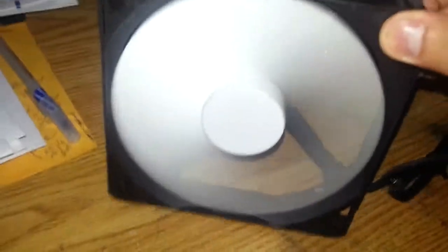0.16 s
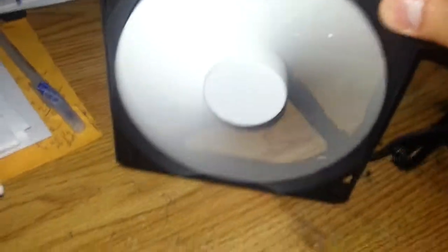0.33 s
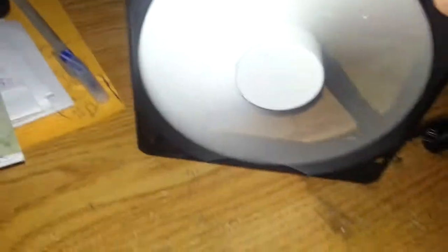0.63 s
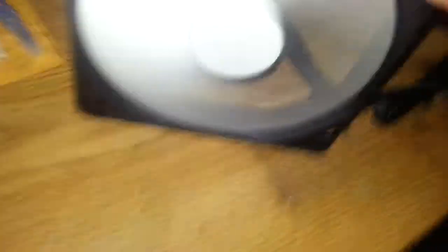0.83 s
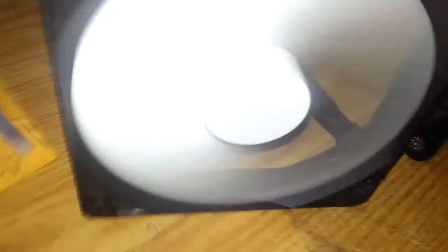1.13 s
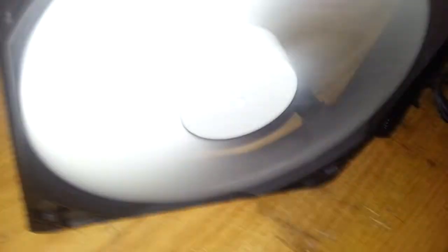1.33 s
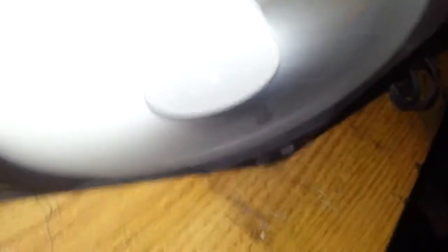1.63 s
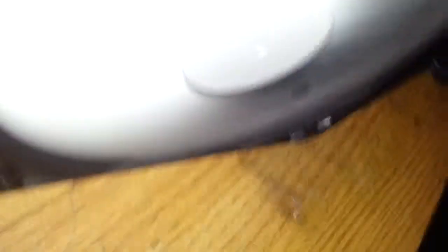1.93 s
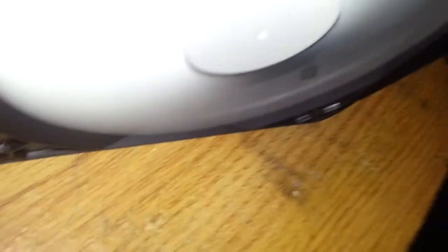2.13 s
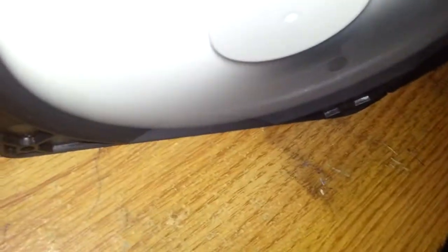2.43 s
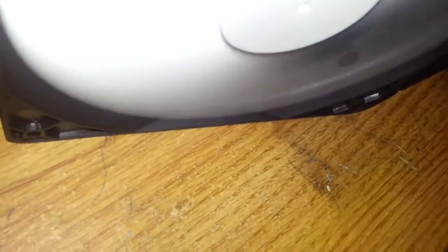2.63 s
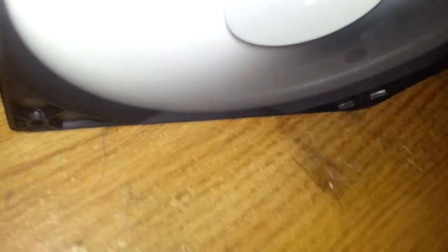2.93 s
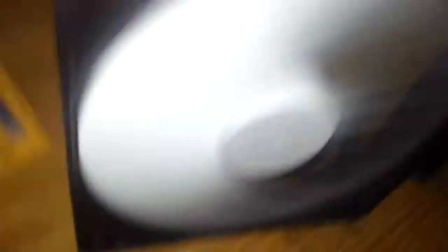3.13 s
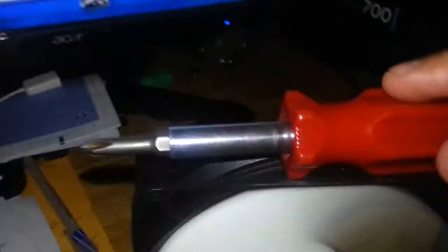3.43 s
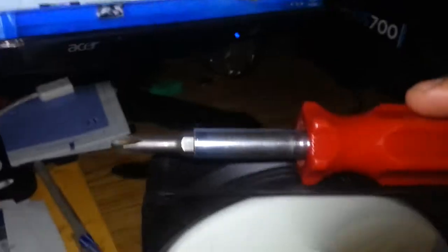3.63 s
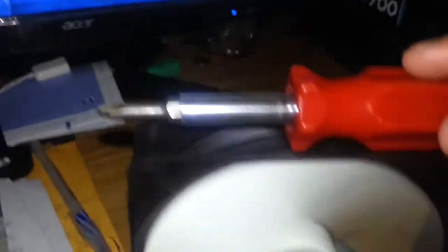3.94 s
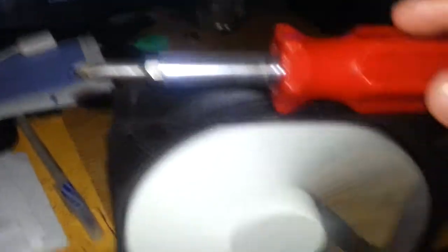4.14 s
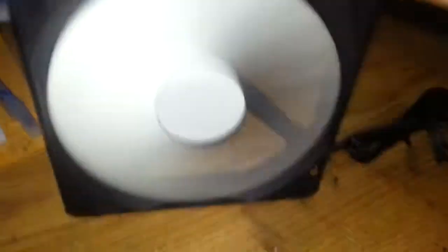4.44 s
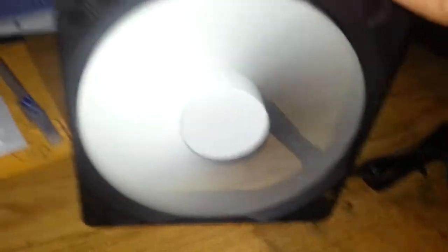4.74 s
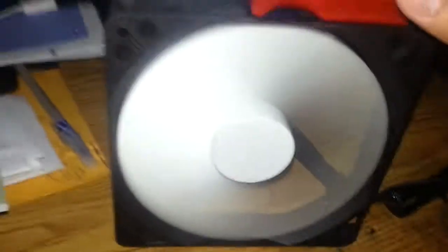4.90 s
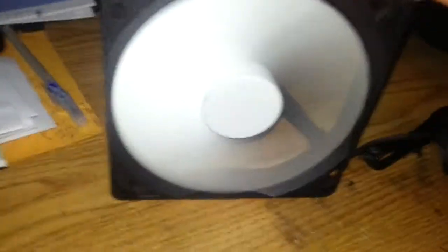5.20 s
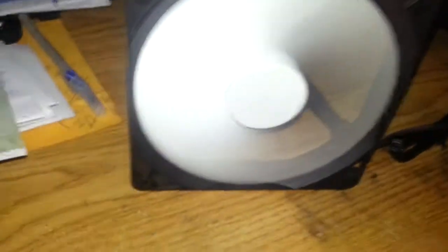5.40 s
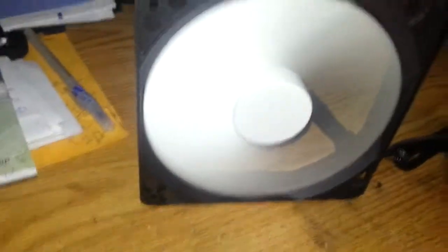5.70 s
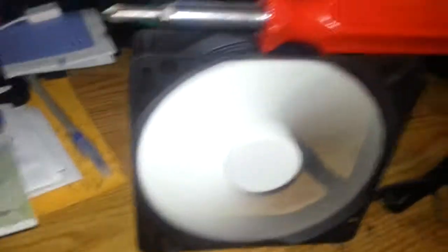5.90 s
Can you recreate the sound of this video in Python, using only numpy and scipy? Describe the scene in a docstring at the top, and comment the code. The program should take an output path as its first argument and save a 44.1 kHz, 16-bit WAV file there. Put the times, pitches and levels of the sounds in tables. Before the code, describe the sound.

Steady fan rush, close up and slightly uneven, with a thin motor hum wavering beneath. After a soft thump at the outset, the microphone shifts from the front to the side and the sound grows darker and stronger. Near the middle there is one hard plastic knock with a dull thump, a quick rattle of smaller contacts, wooden taps and bright steel ticks. The microphone returns to the front and the fan continues in a dry small room.

```python
"""On a wooden desk in a small room, a computer case fan runs: airflow hiss is shaped noise, the thin motor whine
near 300 Hz is a set of sines locked to one speed, and faint hums are wavering sines.
The microphone moves from in front of the fan to beside its frame and back; each partial is beamed its own way.
A hand bumps the fan, then reaches past it for a screwdriver, which knocks on the frame and clatters on the desk:
each contact is a click of noise, decaying modes and a desk thud; scuffs are brief noise.
A single low pulse makes a dull thump at the hardest knock."""
import sys
import numpy as np
from scipy import signal
from scipy.fft import rfft, irfft, next_fast_len
from scipy.io import wavfile
from scipy.ndimage import uniform_filter1d, map_coordinates

SR = 44100
rng = np.random.default_rng(int(sys.argv[2]) if len(sys.argv) > 2 else 0)


def master(y):
    """Save y as 16-bit WAV."""
    cut = np.clip(np.atleast_2d(y).T, -1, 1)
    pcm = np.round(cut * 32767)  # scale
    wavfile.write(sys.argv[1], SR, pcm.astype(np.int16))


N = 267334

# Closeness runs from 0 (in front of the fan) to 1 (beside its frame); left-right dB is positive to the left.
# microphone path: time_s, closeness (0-1), airflow_level_db, left_right_db
MIC_PATH = [(0, 0.22, 0, 2), (1.02, 0.28, 0.5, 2), (1.17, 0.35, 1.2, 1), (1.45, 0.36, 0.5, -0.5),
            (1.58, 0.69, 2, 0.5), (2.05, 0.89, 2.5, 0.5), (3.1, 0.92, 4, 1.5), (3.3, 0.13, 1, 2),
            (4.05, 0.12, 1, 1), (4.33, 0.04, 1.5, -1), (6.06, 0.01, 1, 0.5)]
# closeness at which the microphone looks down from above, sees the blades aslant, and passes over the rim
ABOVE, ASLANT, RIM = 0.11, 0.22, 0.42

# airflow spectrum in front of the fan, relative: frequency_hz, level_db (per Hz)
AIR_IN_FRONT = [(55, -28), (170, -12.5), (230, -5), (410, 0.5), (520, -5), (740, -5.5), (920, 4.5),
                (1300, -0.5), (2700, -0.5), (4700, -7), (6000, -15), (9000, -18.5), (11200, -33),
                (14500, -39)]
# airflow spectrum beside the frame, relative: frequency_hz, level_db (per Hz)
AIR_BESIDE = [(50, -34), (130, -15.5), (230, -3.5), (380, -2.5), (520, -4), (850, 0), (1400, -0.5),
              (2800, -5.5), (4000, -12), (4800, -10.5), (6000, -18.5), (9000, -19), (11200, -35),
              (14500, -51)]
# correlation of the air noise at the two microphone ports: frequency_hz, likeness (clipped to -1..1)
PORT_LIKENESS = [(60, -0.1), (200, 1.04), (750, 0.65), (1200, 0.45), (1800, 0.5), (4000, 0)]
# balance of the air noise between the ports: frequency_hz, left_right_db
PORT_BALANCE = [(100, -4.5), (500, -1), (1200, -3.5), (2700, -8), (6000, -7), (12000, -1)]

# motor pulse rate, picking up after the bump and then wandering a little: time_s, pitch_hz
MOTOR_SPEED = [(0, 297.7), (.2, 298.8), (.65, 300), (1.1, 301), (1.9, 301.5), (2.6, 299.8), (3.3, 299.6),
               (4.1, 300.2), (5, 300.5), (5.8, 301)]
# radiation of the four lowest partials:
# multiple (of the pulse rate), front_db, aslant_db, over_rim_db, beside_db
PARTIAL_BEAMS = [(1, -45, -50.5, -43, -31), (2, -60.5, -50, -46, -45.5), (3, -40, -48.5, -46.5, -50),
                 (4, -42, -41.5, -47, -48)]
# swells and dips of the four lowest partials: time_s, first_db, second_db, third_db, fourth_db
PARTIAL_SWELLS = [(0, -1, -3, -11, -1.5), (.17, -1, 0, -6, -2.5), (.3, -1.5, -3.5, 0.5, 2),
                  (.57, -5, 1.5, 4.5, 2.5), (.66, 4, -3, 1, -2), (.76, 0, -5.5, -6, 2.5),
                  (1, -2, 3.5, -4, 0.5), (1.13, 3, -2, -2, -4), (1.4, -2.5, 3.5, -1.5, -5),
                  (1.58, 3, -1, 1, -9), (1.75, -1, 1, 2.5, -2), (2.15, -.5, 4, 1.5, 0.5),
                  (2.44, 0, -3, 0.5, -1), (2.57, 2.5, 3.5, 1, -5), (2.73, 2.5, -1.5, 5, 2.5),
                  (2.85, 0.5, -12, 2, -5), (3.22, 2.5, -4, 0.5, -1), (3.42, 1, -1, 1, 2),
                  (3.56, 0.5, 1, -1, -4), (3.7, -0.5, -4, -2, -2.5), (3.86, -2, 0, -3, 1),
                  (3.96, 1.5, 0, -1, -3.5), (4.1, -1.5, -5, -7, -1), (4.25, -1.5, 3, -0.5, 1),
                  (4.65, 2, -3, 0.5, 0.5), (5.05, 1, -11, -1.5, 0.5), (5.4, 1, -4, 2, -1.5),
                  (5.75, 0, -5, -0.5, 2.5), (6.06, -5, 1, -2.5, 1.5)]
# the four lowest partials at the two ports: front_left_right_db, front_left_lead_rad,
# beside_left_right_db, beside_left_lead_rad, turned_at (closeness by which the turn is complete)
PARTIAL_PLACES = [(0, 0.29, -6, 1.5, 0.57), (-8.5, -0.023, -4, -1, .8), (-2.5, -0.055, 7.5, -1.5, 0.55),
                  (-4.5, -0.21, -1, -1.5, 0.31)]
# upper partials: multiple (of the pulse rate), front_db, above_db, beside_db
UPPER_PARTIALS = [(5, -52, -50, -50), (6, -55, -56, -55), (7, -57.5, -51.5, -56.5), (8, -54.5, -53, -56.5),
                  (9, -63, -69, -55), (10, -56, -54.5, -58), (12, -67, -61, -69)]
# a reaching hand disturbs the intake: start_s, end_s, fundamental_lift_db, low_overtone_lift_db,
# fundamental_turn_rad (between the ports)
HAND_REACHES = [(2.594, 2.79, -5.5, 6, 1.8), (2.827, 3.142, -1, 6.5, -0.47)]
REACH_FADE_S = 0.019
# faint wavering hums of steady mean pitch: pitch_hz, level_db
HUM_TONES = [(217.4, -59), (400.6, -56), (701, -65.5), (1603, -62)]

# In all contact tables below, click_db is before a common halving and desk_db before a common thud level.
# desk modes under every contact, before random scatter: pitch_hz, level_db, t60_s
DESK_MODES = [(126, -22, 0.19), (233, -13.5, 0.076), (385, -2, 0.034), (544, -2, 0.052), (702, -7, 0.038),
              (1030, -5, 0.025), (1390, -2, 0.049)]
# relative spectrum of the hard click of a contact: frequency_hz, level_db (per Hz)
CLICK_SPECTRUM = [(100, -5), (450, -9), (800, 11), (1500, 2), (2200, 7), (3300, 2), (5300, -1.5),
                  (7000, 2.5), (9500, -2), (12000, -6), (15000, -12)]
# a hand bumps the fan, and later jogs it in reaching past: start_s, ring_db
HAND_BUMPS = [(0.0716, -17), (0.079, -22.5), (0.0894, -26), (0.0972, -37), (2.8165, -18), (2.921, -25)]
# modes of the bumped fan: pitch_hz, level_db, t60_s
FAN_MODES = [(299, -7.5, 0.057), (430, 1, 0.045), (710, -3, 0.016), (800, -3.5, 0.033)]
# faint high scuffs of the handling: centre_s, level_db, centre_hz, half_length_s (to 1/e)
SCUFF_EVENTS = [(1.09, -43, 8000, .0015), (2.381, -33.5, 8500, 0.0018), (5.62, -52, 12800, 0.02)]
# knocks of the screwdriver on the plastic frame, a duller contact as the frame rocks back on the desk,
# and a graze: start_s, ring_db, click_db, desk_db, pitch_ratio (of the spot)
FRAME_CONTACTS = [(2.457, -8.5, 3, -31, 1), (2.4652, -25, -12, -44, 1.02), (2.47, -30, -10, -36, 1),
                  (2.4965, -16, -6.5, -16.5, 1.13), (2.5028, -22, -17, -16.5, .74),
                  (2.5078, -23, -19, -24, .92), (2.516, -30, -19, -30, 1.25), (2.5218, -27, -21, -27, 1.1),
                  (2.8145, -24, -19, -27, 1.05)]
# modes of the frame: pitch_hz, level_db, t60_s
FRAME_MODES = [(190, -23, 0.057), (760, -11, 0.033), (845, 2.5, 0.044), (948, -4, 0.044), (1070, -2.5, .04),
               (2020, -19, 0.043), (2320, -9, .04), (3265, -2.5, 0.021)]
# dull thump at the hardest knock: level scales u * exp(-u), whose peak is 1/e
PULSE_S, PULSE_DB, PULSE_RISE_S = 2.457, -24, 0.00074
# screwdriver taps on the desk: start_s, ring_db, click_db, desk_db, left_right_db, pitch_ratio (of the spot)
DESK_TAPS = [(2.812, -16.5, -8, -17, -5, 0.92), (2.9426, -13.5, -8, -19, -9.5, 1.004),
             (2.949, -14, -11, -15, -1, 1.07), (2.9732, -20.5, -27, -19, -7, 1),
             (3.0782, -15.5, -15, -15.5, -5, .97), (3.083, -16.5, -20, -30, -5, .97),
             (3.0879, -24, -20, -20, -4, 1)]
# modes of the tapped spot: pitch_hz, level_db, t60_s
TAPPED_SPOT_MODES = [(953, -5.5, 0.037), (1624, 2.5, 0.02), (1980, -10, 0.011), (2510, -2, 0.015)]
# clacks of the handle: start_s, ring_db
HANDLE_CLACKS = [(2.477, -14.5), (2.9609, -8), (2.9662, -13.5), (2.968, -12.5)]
# modes of the handle: pitch_hz, level_db, t60_s
HANDLE_MODES = [(2330, -0.5, 0.017), (2710, -2.5, 0.021), (3700, -11, 0.015)]
# ticks of the steel bit in its shaft: start_s, ring_db, click_db
BIT_TICKS = [(2.736, -15.5, -18), (2.8157, -5, -10), (2.8428, -19, -24), (2.924, -13.5, -15),
             (2.9481, -3.5, -8), (2.97, -9.5, -11), (3.0114, -16, -20), (3.08, -15.5, -23),
             (3.408, -26, -34)]
# modes of the bit: pitch_hz, level_db, t60_s
BIT_MODES = [(3333, -5.5, 0.018), (4070, -9, 0.0066), (4450, -1.5, 0.0074)]
# reverberation of the small room: frequency_hz, t60_s
ROOM_DECAY = [(150, 0.62), (1000, 0.18), (2500, 0.16), (4000, 0.22), (12000, 0.28)]
TOP_HZ = 15000  # band limit


def amp(db):
    """Level to gain: 20 dB is a factor of ten in amplitude."""
    return 10 ** (np.asarray(db) / 20)


def unit(x):
    """Normalisation to an rms of 1."""
    return x / np.sqrt(np.mean(x ** 2) + 1e-20)


def along(points, hz):
    """Interpolation of (frequency, value) points on a logarithmic frequency axis."""
    f, v = np.transpose(points)
    return np.interp(np.log(hz + 1), np.log(f + 1), v)


def curves(rows):
    """Linear interpolation in time: one value per sample for each column after the time."""
    s, *columns = np.transpose(rows)
    return [np.interp(np.arange(N) / SR, s, column) for column in columns]


def wobble(rate):
    """Smooth random modulation: a spline through normal deviates, rate knots a second."""
    knots = rng.standard_normal(int(N * rate / SR) + 4)
    return map_coordinates(knots, [np.arange(N) * rate / SR])


def filtered(x, response):
    """Linear filtering: the spectrum of x is multiplied by a response of frequency."""
    n = x.shape[-1]
    m = next_fast_len(n + 8192)
    return irfft(rfft(x, m) * response(np.fft.rfftfreq(m, 1 / SR)), m)[..., :n]


def split(difference):
    """Stereo difference: half is added at the left and half taken from the right."""
    return np.array([[0.5], [-0.5]]) * difference


def decay(t, t60):
    """Exponential decay by 60 dB in t60 seconds."""
    return np.exp(-np.log(1000) * t / t60)


def highpass(x, cutoff_hz):
    """Second-order high-pass: bass falls by 12 dB an octave."""
    return signal.sosfilt(signal.butter(2, cutoff_hz, "highpass", fs=SR, output="sos"), x)


def rush(spectrum, patchy_db, lag_ms):
    """Turbulence as partly coherent stereo noise of rms 1, faintly patchy from eddies and late at the left port."""
    z = signal.stft(rng.standard_normal((2, N)), nperseg=512)[2]
    patches = uniform_filter1d(rng.standard_normal(z.shape[1:]), size=6, axis=0)  # across frequency
    patches = uniform_filter1d(patches, size=14, axis=1)  # along time
    pair = signal.istft(z * amp(patchy_db * unit(patches)), nperseg=512)[1][:, :N]

    def mid_side(hz):
        # shares cos and sin of half the angle give the ports the wanted correlation
        angle = np.arccos(np.clip(along(PORT_LIKENESS, hz), -1, 1)) / 2
        return amp(along(spectrum, hz)) * [np.cos(angle), np.sin(angle)]

    def ports(hz):
        delay = np.exp(-2j * np.pi * split(hz) * lag_ms / 1000)
        return amp(split(along(PORT_BALANCE, hz))) * delay

    mid, side = filtered(pair, mid_side)
    return unit(filtered(np.array([mid + side, mid - side]), ports))


def airflow(front_db=-36.0, side_db=-35, treble_hz=5500, screen_db=-4.0,
            beam_hz=9500, beam_db=7.5, beam_at=0.38, beam_width=0.05):
    """Blade turbulence and directivity: fuller low middle at the side, hiss beamed, treble screened by the frame."""
    close, level_db, pan_db = curves(MIC_PATH)
    close = np.clip(close, 0, 1)
    # the two noises cross-fade in power
    front = amp(front_db) * np.sqrt(1 - close) * rush(AIR_IN_FRONT, patchy_db=1.0, lag_ms=0.099)
    side = amp(side_db) * np.sqrt(close) * rush(AIR_BESIDE, patchy_db=1.0, lag_ms=0.22)
    air = front + side
    treble = filtered(air, lambda hz: hz ** 4 / (hz ** 4 + treble_hz ** 4))
    screening = (amp(screen_db * close) - 1) * treble
    hiss = filtered(air, lambda hz: np.exp(-((hz - beam_hz) / (0.11 * beam_hz)) ** 2))
    in_beam = np.exp(-((close - beam_at) / beam_width) ** 2)
    beaming = (amp(beam_db * in_beam) - 1) * hiss / 2  # only half of the extra gain is added
    return amp(level_db + split(pan_db)) * (air + screening + beaming)


def reach():
    """Intake disturbance: a hand moves in, stays and withdraws; gives two level lifts and a phase turn per sample."""
    t = np.arange(N) / SR

    def inside(start, end):
        return np.clip(np.minimum(t - start, end - t) / REACH_FADE_S + 0.5, 0, 1)

    return sum(np.outer(effect, inside(start, end)) for start, end, *effect in HAND_REACHES)


def motor(flutter_db=1, upper_flutter_db=2.5, jitter_hz=0.324, scatter=0.035, low_sway_db=1.3, swing=0.67):
    """Harmonic radiation: partials share one unsteady speed, each with its own directivity and flutter."""
    close = curves(MIC_PATH)[0]
    fundamental_lift_db, overtone_lift_db, hand_turn = reach()
    speed_hz = curves(MOTOR_SPEED)[0] + jitter_hz * wobble(14)
    phase = 2 * np.pi * np.cumsum(speed_hz) / SR
    out = np.zeros((2, N))
    for (k, *beam_db), swell_db, place in zip(PARTIAL_BEAMS, curves(PARTIAL_SWELLS), PARTIAL_PLACES):
        front_pan_db, front_lead, side_pan_db, side_lead, turned = place
        db = np.interp(close, [0, ASLANT, RIM, 1], beam_db) + swell_db + low_sway_db * wobble(9)
        db = db + (fundamental_lift_db if k == 1 else overtone_lift_db) + flutter_db * wobble(16)
        pan_db = np.interp(close, [ASLANT, turned], [front_pan_db, side_pan_db])
        lead = np.interp(close, [ASLANT, turned], [front_lead, side_lead])
        lead = lead + (hand_turn if k == 1 else swing * close * wobble(4.47))
        start_phase = rng.uniform(0, 2 * np.pi)
        out += amp(db + split(pan_db)) * np.sin(k * phase + start_phase + split(lead))
    for k, front_db, above_db, side_db in UPPER_PARTIALS:
        # short waves: small moves change their level and direction
        lead = 2.2 * wobble(0.97) - 0.6
        drift = rng.uniform(0, 2 * np.pi) + split(lead) + k * scatter * wobble(70)
        sway_db = upper_flutter_db * wobble(6) + flutter_db * wobble(25)
        db = np.interp(close, [0, ABOVE, ASLANT, RIM], [front_db, above_db, front_db, side_db])
        out += amp(db + sway_db + split(-12.0)) * np.sin(k * phase + drift)
    return np.sqrt(2) * out  # levels are rms


def hums(waver_db=3.5):
    """Amplitude and phase modulation: faint tones of steady mean pitch waver under the whine."""
    t = np.arange(N) / SR
    out = np.zeros(N)
    for hz, db in HUM_TONES:
        out += amp(db + waver_db * wobble(11)) * np.sin(2 * np.pi * hz * t + 0.75 * wobble(5.6))
    return np.sqrt(2) * out  # levels are rms


def contact(s, body, ring_db, click_db, desk_db, top_hz, pan_db, pitch=1, click_t60=0.02, grit=0.56,
            thud_db=-5, attack=0.00042, lag=0.0001, detune=0.0067):
    """Impact excitation: a hard click, the short rough modal ring of the body struck, and a thud of the desk."""
    t = np.arange(SR // 4) / SR

    def sine(hz):
        # the left port lags, by a limited phase
        return np.sin(2 * np.pi * hz * t - split(np.minimum(2 * np.pi * hz * lag, 1.3)))

    def noise(colour):
        return unit(filtered(rng.standard_normal((2, len(t))), colour))

    def rough(mode):
        # crowded modes round a main one
        return sine(mode) + grit * noise(lambda hz: 1 / (1 + ((hz - mode) / (0.17 * mode)) ** 2))

    def soft(hz):
        # a soft contact excites little treble
        return 1 / (1 + (hz / top_hz) ** 2)

    ring = thud = 0
    for k, (hz, db, t60) in enumerate(body):
        mode_hz = hz * pitch * (1 + detune * rng.uniform(-0.8, 1))
        ring = ring + (-1) ** k * amp(ring_db + db) * decay(t, t60) * rough(mode_hz)
    click = noise(lambda hz: amp(along(CLICK_SPECTRUM, hz)) * soft(hz))
    click = amp(click_db) * decay(t, click_t60) * click / 2
    for k, (hz, db, t60) in enumerate(DESK_MODES):
        gain = amp(desk_db + thud_db + db + rng.normal(0, 1.9)) * soft(hz)
        thud = thud + (-1) ** k * gain * decay(t, t60) * sine(hz * rng.uniform(0.926, 1.094))
    onset = 1 - np.exp(-t / attack)
    out = np.zeros((2, N + len(t)))
    out[:, round(s * SR):][:, :len(t)] = amp(split(pan_db)) * onset * (ring + click + thud)
    return out[:, :N]


def bumps(click_db=-6, desk_db=-16, low_hz=250):
    """Soft impact: a hand excites the fan's low modes as a hollow thump with hardly any click."""
    thump = sum(contact(s, FAN_MODES, db, db + click_db, db + desk_db, top_hz=1000, pan_db=-4.0)
                for s, db in HAND_BUMPS)
    return highpass(thump, low_hz)


def room(x):
    """Reverberation: the small room answers after a few milliseconds with decaying noise; bass lasts longest."""
    hz, t, z = signal.stft(rng.standard_normal((2, SR // 2)), SR, nperseg=256)
    t60 = along(ROOM_DECAY, hz)[:, None]
    tail = signal.istft(z * decay(t, t60), SR, nperseg=256)[1]
    tail = np.pad(tail / np.linalg.norm(tail[0]), ((0, 0), (200, 0)))  # delay in samples
    return signal.fftconvolve(x, tail, axes=1)[:, :N]


def scuffs(width=0.22):
    """Friction noise: light brushing contacts give brief swells of thin, high noise."""
    t = np.arange(N) / SR

    def hiss(centre):
        band = lambda hz: np.exp(-(np.log((hz + 1) / centre) / width) ** 2 / 2)
        return unit(filtered(rng.standard_normal((2, N)), band))

    return sum(amp(db) * np.exp(-((t - s) / half) ** 2) * hiss(hz) for s, db, hz, half in SCUFF_EVENTS)


def frame_knocks():
    """Modal excitation of the frame: screwdriver knocks, a duller contact as it rocks back on the desk, a graze."""
    return sum(contact(s, FRAME_MODES, ring_db, click_db, desk_db, top_hz=14800, pan_db=-3.5, pitch=pitch, grit=0.27)
               for s, ring_db, click_db, desk_db, pitch in FRAME_CONTACTS)


def low_pulse(pan_db=-15):
    """One-sided pulse: its low spectrum is a dull thump at the hardest knock, stronger at the right port."""
    u = np.maximum(np.arange(N) / SR - PULSE_S, 0) / PULSE_RISE_S
    return amp(PULSE_DB + split(pan_db)) * u * np.exp(-u)


def clatter(clack_click_db=-7, clack_desk_db=-20, tick_desk_db=-16):
    """Repeated impact of small bodies: the screwdriver taps the desk, its handle clacks and its loose bit ticks."""
    taps = sum(contact(s, TAPPED_SPOT_MODES, db, click_db, desk_db, top_hz=5170, pan_db=pan_db, pitch=pitch)
               for s, db, click_db, desk_db, pan_db, pitch in DESK_TAPS)
    clacks = sum(contact(s, HANDLE_MODES, db, db + clack_click_db, db + clack_desk_db, top_hz=6960,
                         pan_db=-3.5, grit=0.78, attack=0.00038)
                 for s, db in HANDLE_CLACKS)
    ticks = sum(contact(s, BIT_MODES, db, click_db, db + tick_desk_db, top_hz=9500,
                        pan_db=5.5, click_t60=0.012, attack=0.00047)
                for s, db, click_db in BIT_TICKS)
    return taps + clacks + ticks


def contacts(low_hz=95):
    """Radiation from small bodies: all the contacts together, with almost no bass."""
    return highpass(bumps() + scuffs() + frame_knocks() + clatter(), low_hz)


def scene(room_db=-11):
    """Superposition: the running fan, the contacts with their reverberation, and the low pulse."""
    hits = contacts()
    return airflow() + motor() + hums() + hits + amp(room_db) * room(hits) + low_pulse()


def record(dry):
    """Clipping and band limiting: peaks beyond full scale are cut, then a steep low-pass follows."""
    return filtered(np.clip(dry, -1, 1), lambda hz: 1 / (1 + (hz / TOP_HZ) ** 120))


dry = scene()
out = record(dry)
master(out)
```